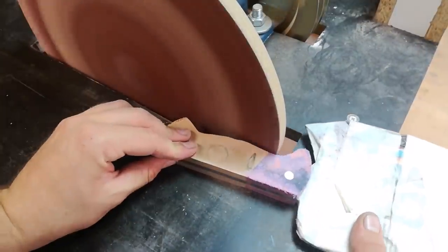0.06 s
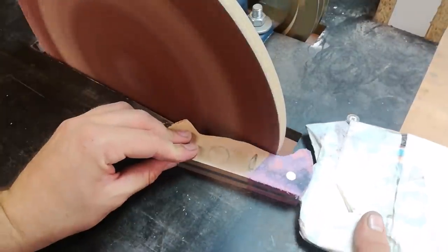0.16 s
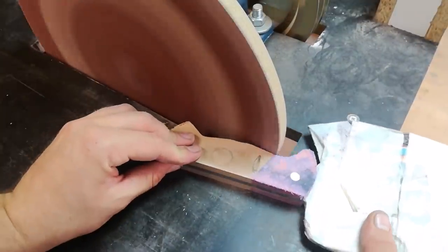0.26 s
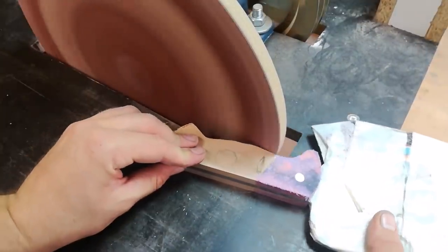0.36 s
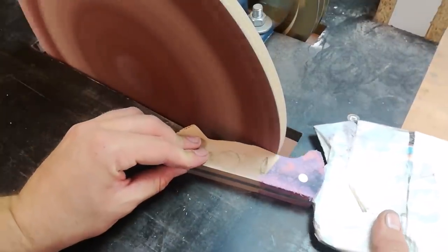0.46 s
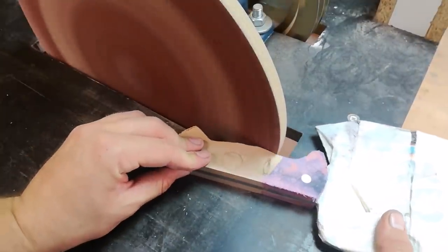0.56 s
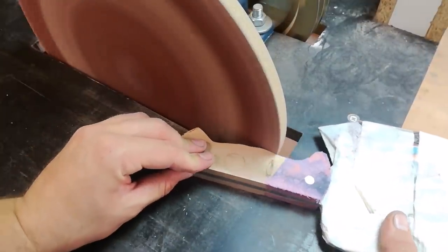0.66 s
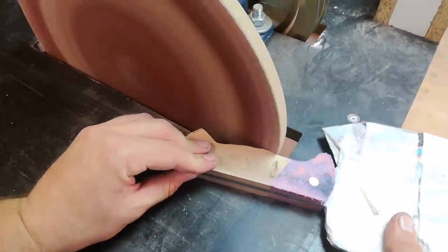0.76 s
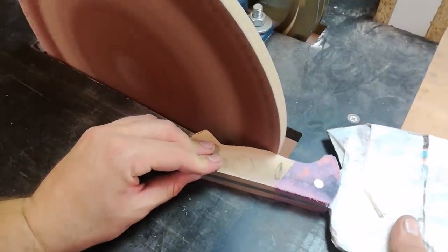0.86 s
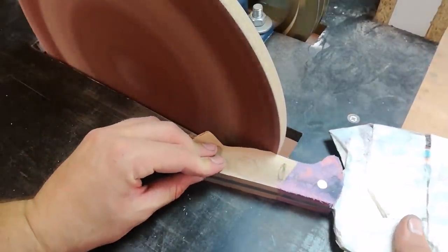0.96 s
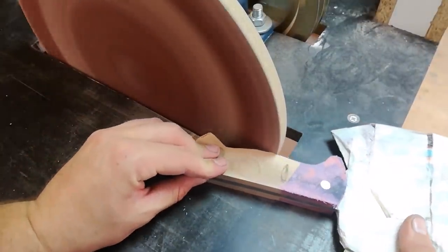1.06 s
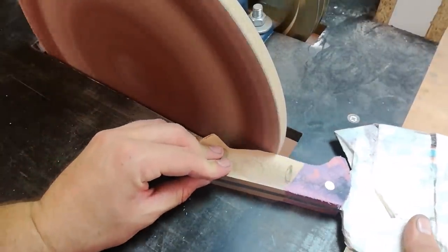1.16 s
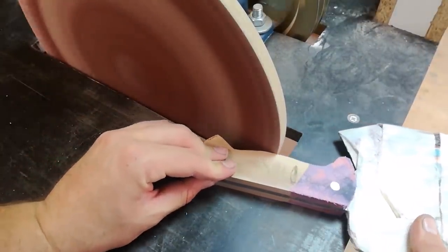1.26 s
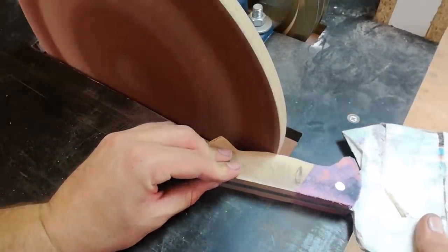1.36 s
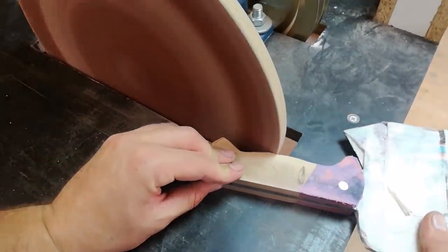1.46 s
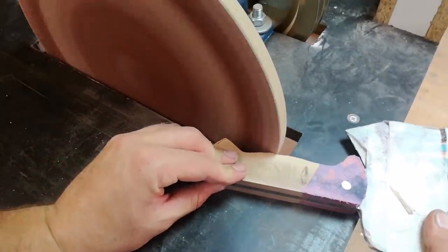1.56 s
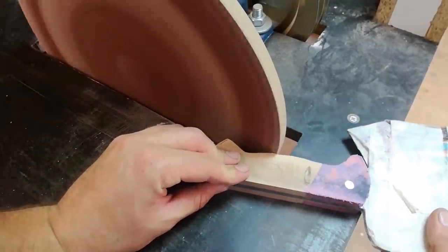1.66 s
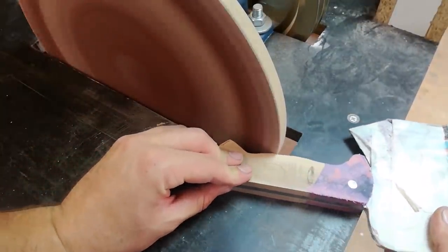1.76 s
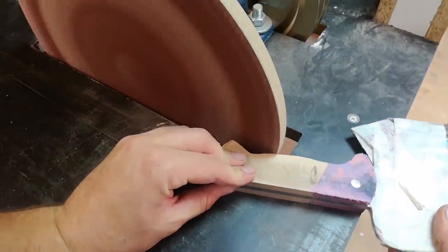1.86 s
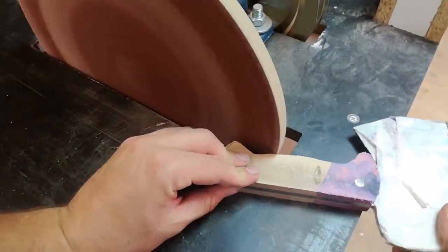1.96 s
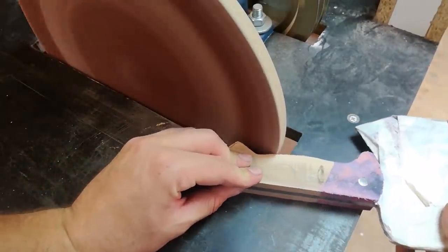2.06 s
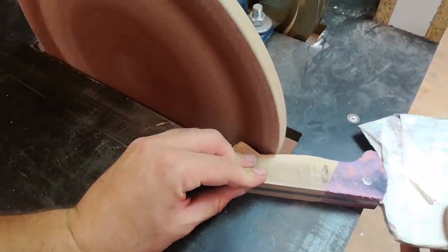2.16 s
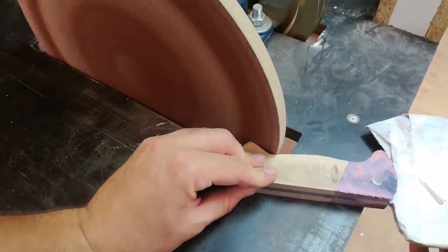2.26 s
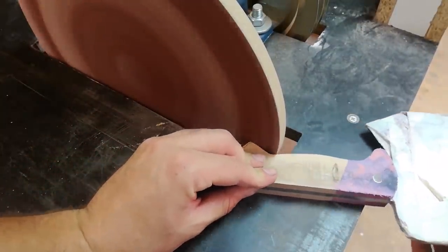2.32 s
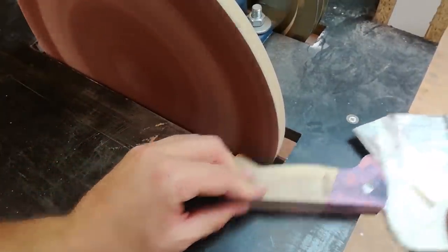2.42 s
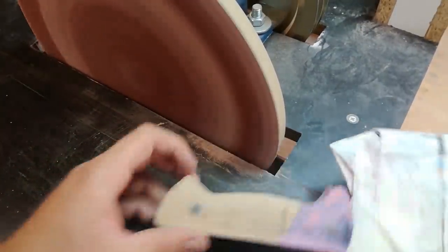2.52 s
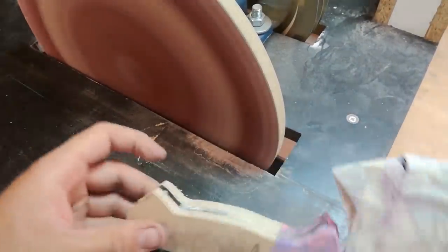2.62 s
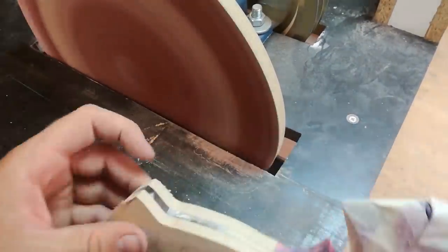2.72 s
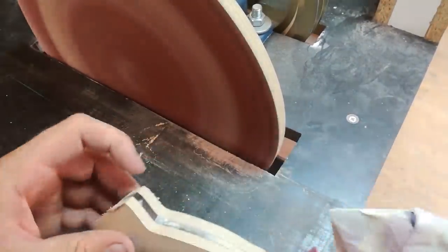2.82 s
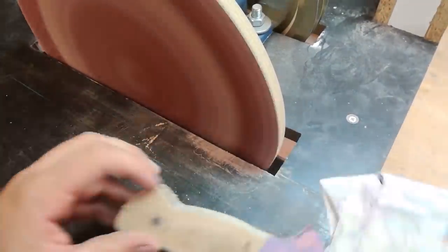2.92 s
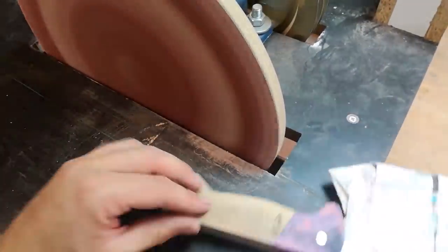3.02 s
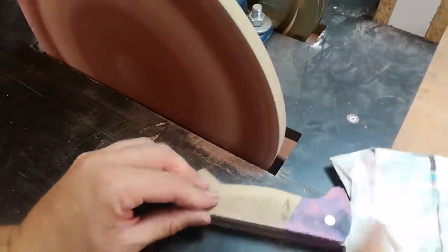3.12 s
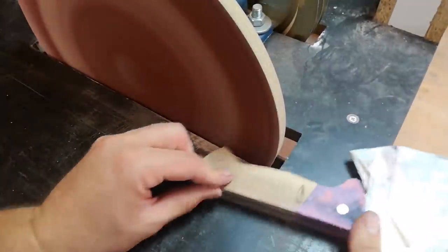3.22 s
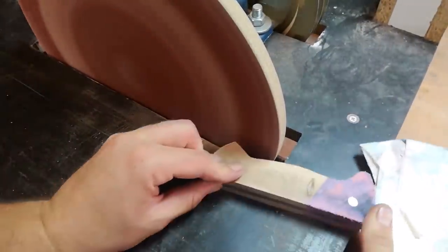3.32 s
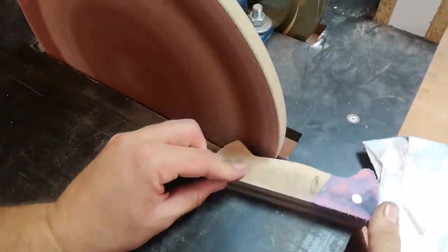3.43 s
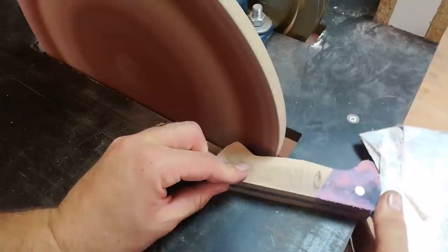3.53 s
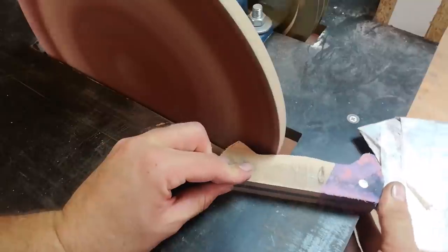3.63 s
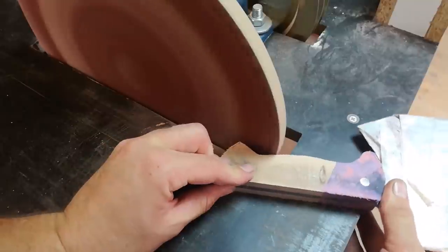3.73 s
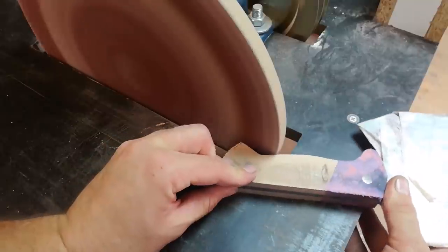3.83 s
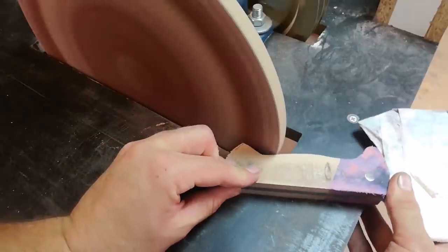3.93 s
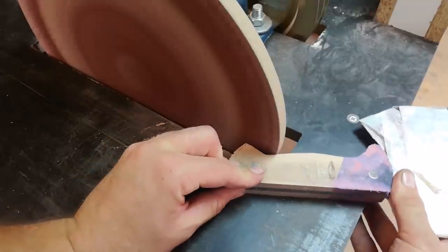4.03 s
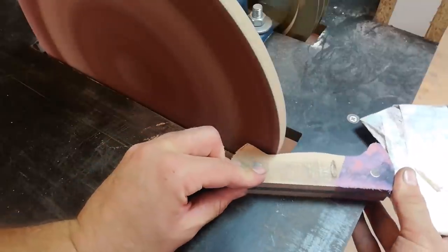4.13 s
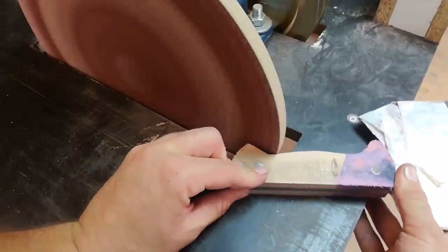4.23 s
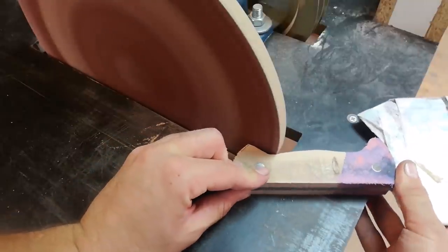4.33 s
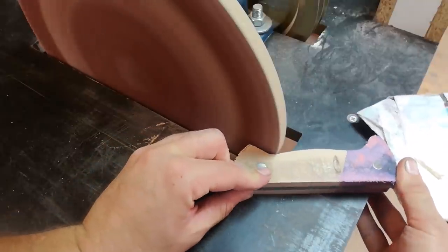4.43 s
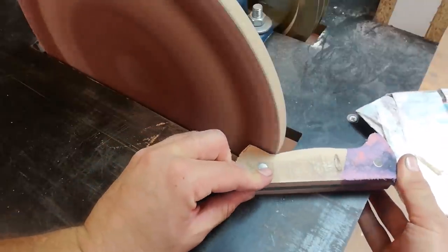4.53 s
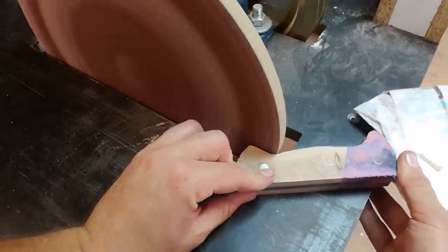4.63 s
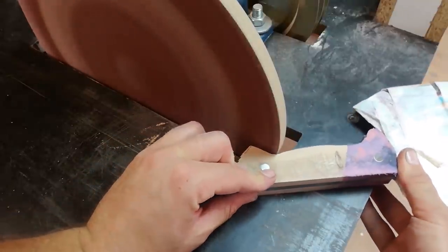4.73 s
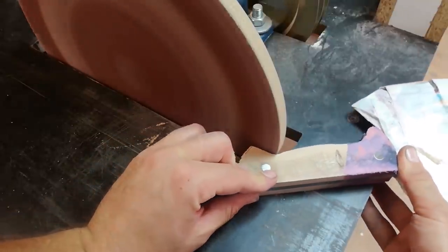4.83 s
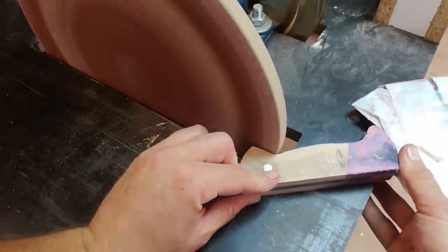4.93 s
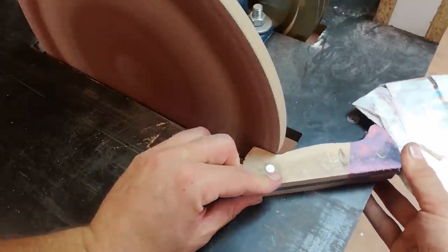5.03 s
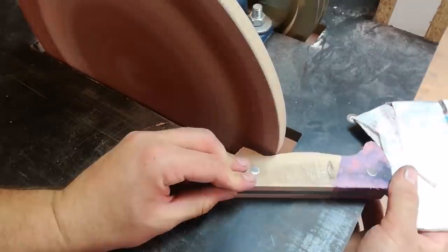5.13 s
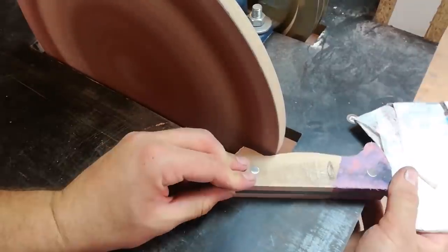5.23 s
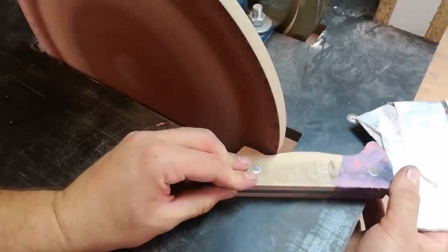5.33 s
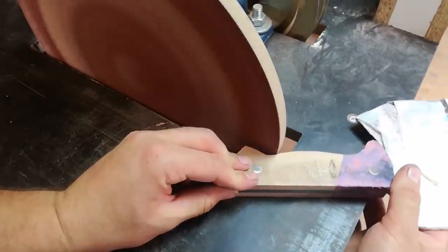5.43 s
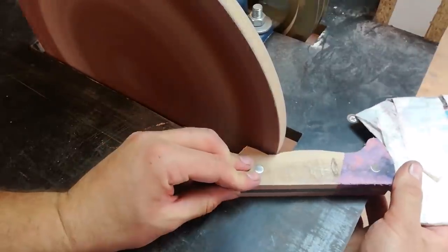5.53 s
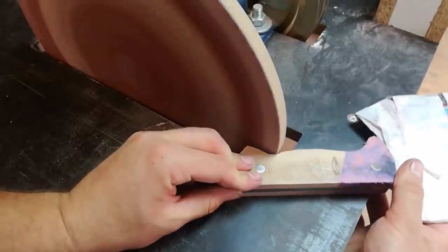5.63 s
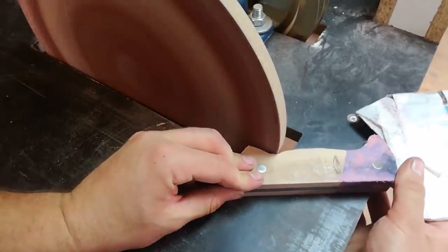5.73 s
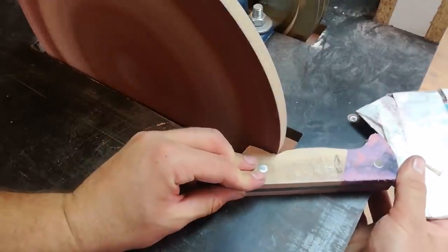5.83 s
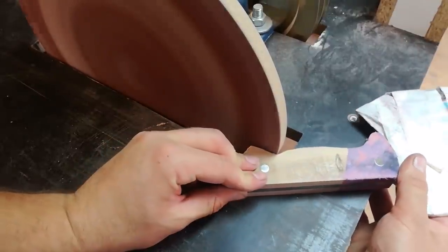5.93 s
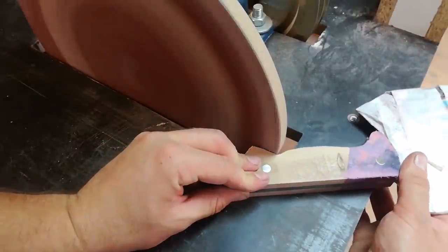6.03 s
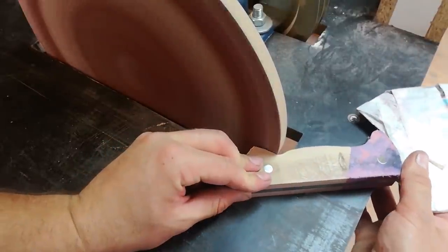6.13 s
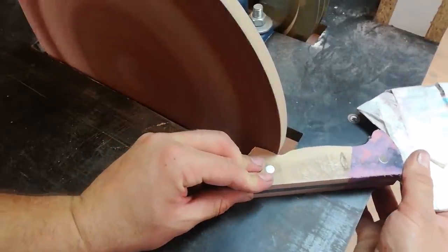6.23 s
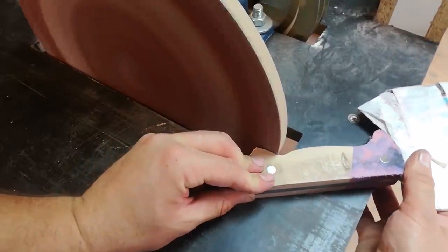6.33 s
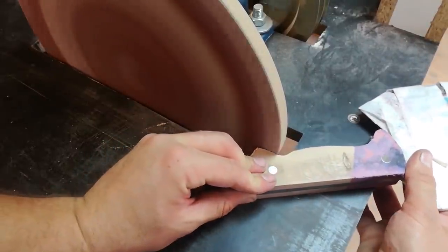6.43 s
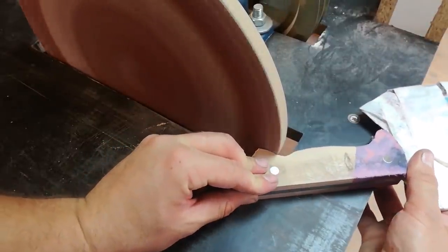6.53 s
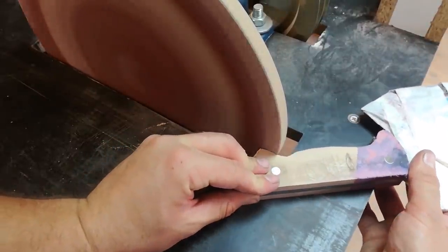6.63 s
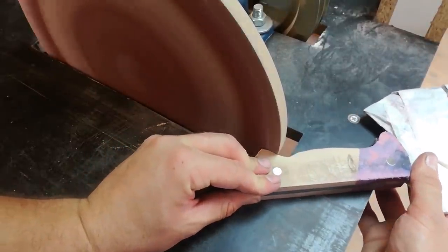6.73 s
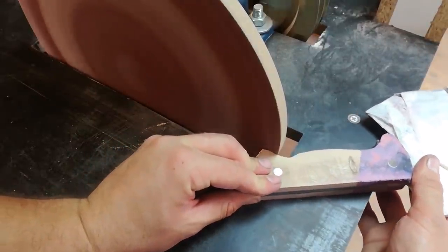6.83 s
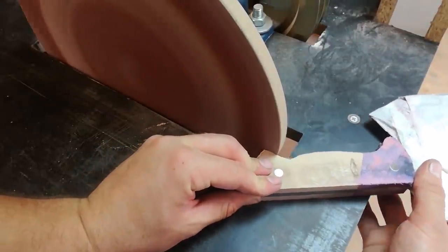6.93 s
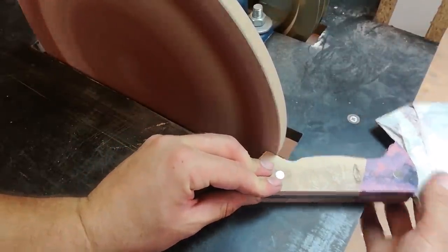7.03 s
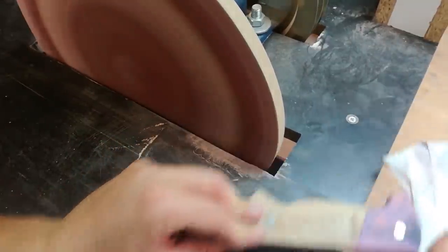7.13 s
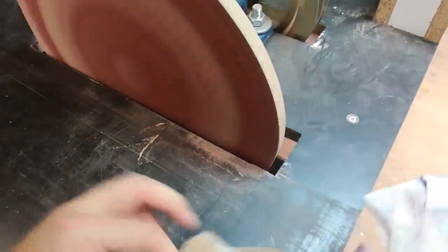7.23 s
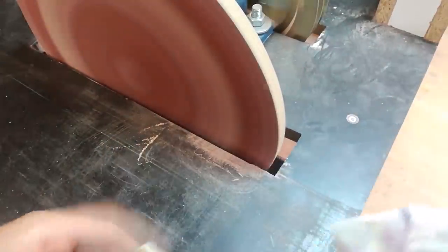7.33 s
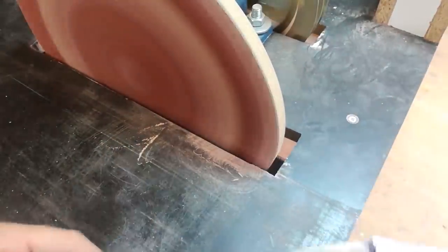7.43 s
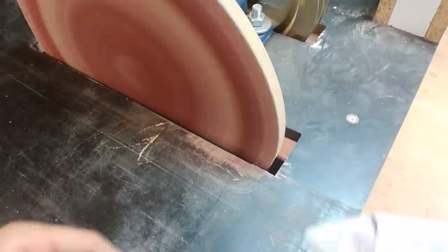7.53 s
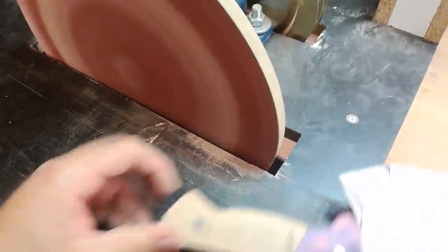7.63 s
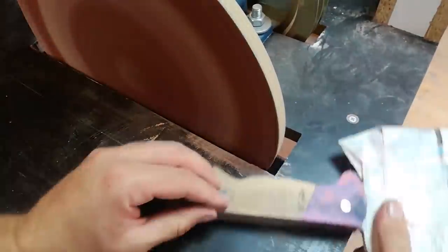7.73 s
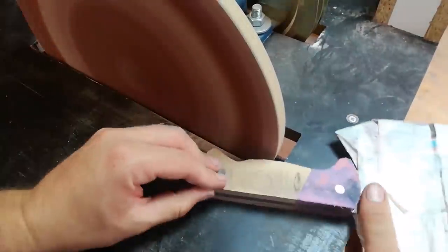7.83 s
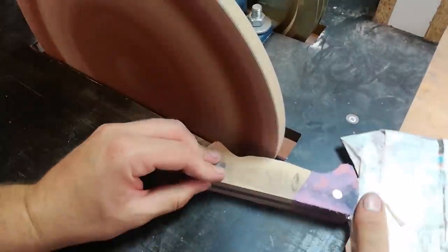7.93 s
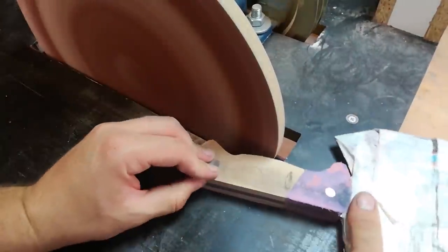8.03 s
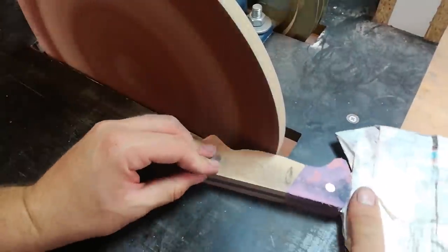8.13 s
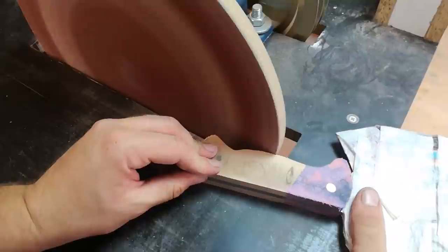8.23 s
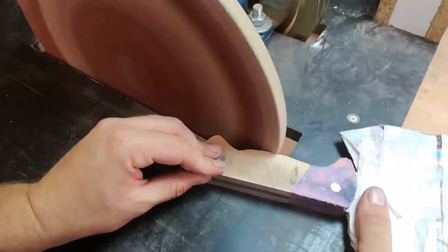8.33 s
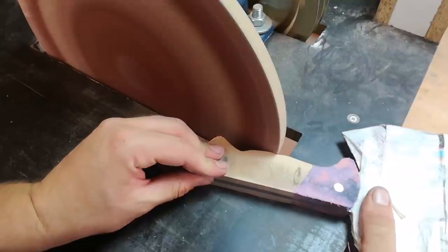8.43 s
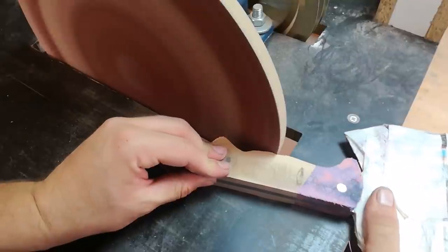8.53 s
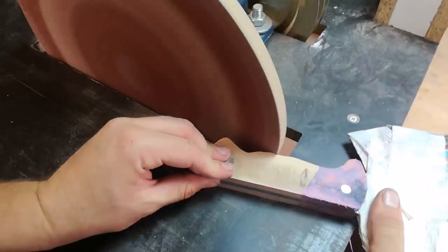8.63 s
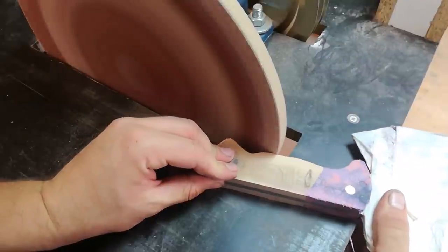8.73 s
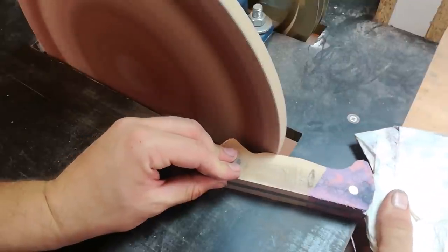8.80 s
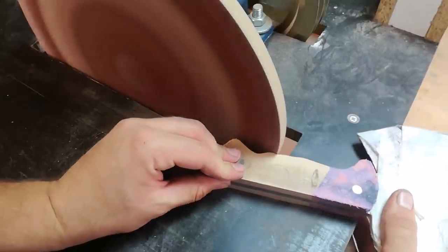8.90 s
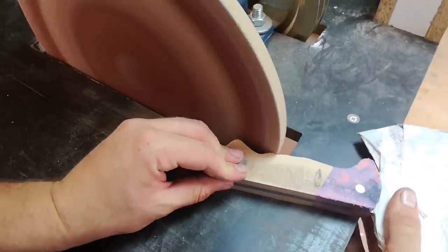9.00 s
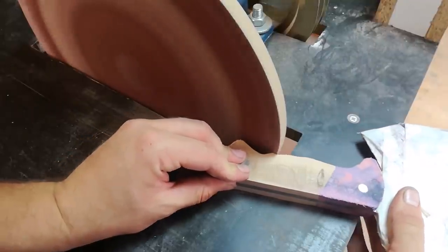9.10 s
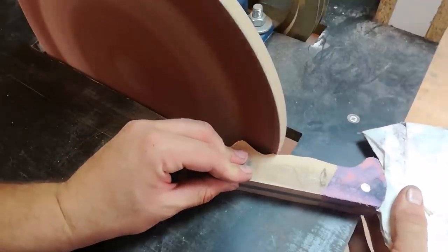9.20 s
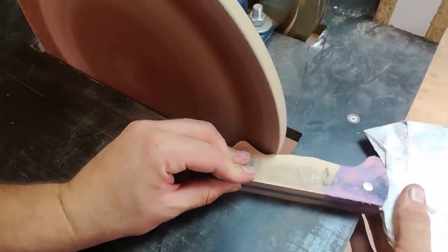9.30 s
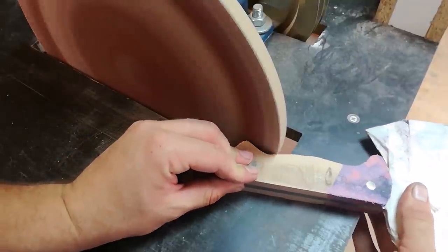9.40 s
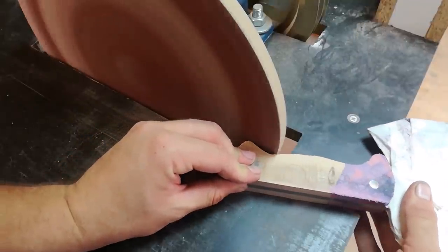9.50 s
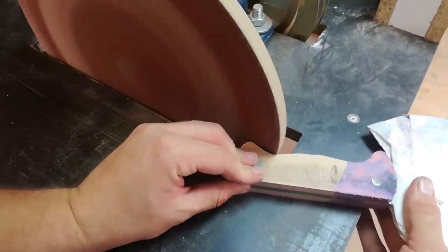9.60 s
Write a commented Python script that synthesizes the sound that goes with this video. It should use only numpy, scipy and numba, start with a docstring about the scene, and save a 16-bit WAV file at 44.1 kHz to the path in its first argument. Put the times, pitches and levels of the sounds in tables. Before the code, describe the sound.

Wood being sanded on a spinning disc in four pulsing, hissing passes, the machine humming softly in the gaps.

```python
"""Sanding a wooden handle

A wooden handle is pressed four times against a disc sander in a small workshop. Every turn drags the
same grit across the wood, and the disc's slight wobble makes the hiss and the table's ring throb.
In each pass the piece touches, settles, rolls onto its edge and lifts; light contact throbs the most.
The motor hums, the disc fans the air, and between passes the piece is twice set on the steel table."""
import sys
import numpy as np
from scipy import signal
from scipy.fft import rfft, irfft, next_fast_len
from scipy.io import wavfile
from scipy.ndimage import uniform_filter1d
from numba import njit

SR = 44100
rng = np.random.default_rng(int(sys.argv[2]) if len(sys.argv) > 2 else 0)


def wav_out(sig):
    """Save sig, one row per channel (or a flat mono array), as 16-bit PCM at SR to the path in sys.argv[1]."""
    wavfile.write(sys.argv[1], SR, np.round(np.clip(np.atleast_2d(sig).T, -1, 1) * 32767).astype(np.int16))


N = 426006
TIME = np.arange(N) / SR
PADDED = next_fast_len(N + 4096)
BINS_HZ = np.maximum(np.arange(PADDED // 2 + 1) * SR / PADDED, 1)
TURNS_PER_S = 27.78
LEFT_LAG_S = 0.00031  # sound reaches the left ear this much later

# How the wood's sound is shared between the ears: (frequency [Hz], left minus right [dB])
WOOD_PAN = [(60, -37), (110, 10), (200, -1), (380, 0), (700, -2), (1290, -5), (2380, -5.5), (4400, -6.5),
            (8120, -11.5), (15000, -18.5)]


def from_db(db):
    """Turn decibels into a gain to multiply by."""
    return 10 ** (np.asarray(db) / 20)


def unit_power(x):
    """Scale a signal so that its average power is 1."""
    return x / np.sqrt(np.mean(x ** 2) + 1e-20)


def ramp(start, length):
    """Rise from 0 to 1 over `length` seconds."""
    return np.clip((TIME - start) / np.maximum(length, 1 / SR), 0, 1)


def bell(x, centre, half_width):
    """A smooth swell of height 1."""
    return np.exp(-((x - centre) / half_width) ** 2)


def fade_in_out(start, end, fade_s=0.2):
    """Fade in around `start` and out around `end`."""
    return ramp(start - fade_s / 2, fade_s) * (1 - ramp(end - fade_s / 2, fade_s))


def drift(rate):
    """A random wander of typical size 1 that changes course `rate` times a second."""
    knots = rng.standard_normal(int(N / SR * rate) + 3)
    return unit_power(np.interp(TIME * rate, np.arange(len(knots)), knots))


def over_hz(points):
    """Join (frequency, value) points into a curve over all frequencies."""
    hz, value = np.transpose(points)
    return np.interp(np.log(BINS_HZ), np.log(hz), value)


def resonance(hz, width_hz):
    """The response of a mode, a pitch at which an object likes to ring; squaring it narrows it."""
    return 1 / (1 + 1j * (BINS_HZ ** 2 - hz ** 2) / (BINS_HZ * width_hz))


def both_ears(x):
    """A low sound reaches the left ear a little later."""
    return np.array([np.interp(TIME - LEFT_LAG_S, TIME, x), x])


def radiate(pair, response, pan):
    """Filter a direct and a scattered signal into stereo; the average of the ears has power 1."""
    # How alike the two ears are: (frequency [Hz], likeness [-1 to 1])
    likeness = [(60, 0.77), (450, 0.62), (1100, 0.92), (2000, 0.11), (4000, .5), (8000, -0.1), (15000, 0.2)]
    direct, scattered = rfft(pair, PADDED) * response
    alike = over_hz(likeness)
    delay = np.exp(-2j * np.pi * BINS_HZ * LEFT_LAG_S)
    left = (alike * delay * direct + np.sqrt(1 - alike ** 2) * scattered) * from_db(over_hz(pan))
    out = irfft(np.array([left, direct]), PADDED)[:, :N]
    return out / np.std(out.mean(axis=0))


def reflections(ripple_db=2.0, spacing_hz=110.5):
    """Close echoes off the table and guard boost some frequencies and weaken others."""
    knots = rng.standard_normal(int(SR / 2 / spacing_hz) + 2)
    ripple = np.interp(BINS_HZ / spacing_hz, np.arange(len(knots)), knots)
    return from_db(ripple_db * np.minimum(BINS_HZ / 3000, 1) * ripple)


def fanned_air():
    """The disc fans the air: a steady rush, coloured by the machine's housing."""
    # The rush of air: (frequency [Hz], level [dB])
    rush = [(40, -36), (90, -15.5), (165, -20), (260, -9), (360, -11.5), (450, -1.5), (700, -4),
            (1000, -7.5), (1450, -6.5), (2260, -7.5), (4680, -12.5), (6020, -7), (9690, -15),
            (16000, -19.5)]
    # Resonances of the housing: (frequency [Hz], width [Hz], boost [dB])
    housing = [(2300, 170, 1.5), (3025, 160, 5.5), (3780, 1340, -5.5), (5870, 2000, 0.5), (8500, 400, -5),
               (9470, 1450, 9.5), (11100, 900, -1), (12400, 1900, 5.5), (15400, 760, 1)]
    # How the rush is shared between the ears: (frequency [Hz], left minus right [dB])
    air_pan = [(60, -9), (110, 1.5), (200, -4), (380, 2.5), (700, -4), (1290, -2.5), (2380, -2), (4400, -1),
               (8120, -8), (15000, -8.5)]
    housing_db = sum(db * 0.5 ** ((2 * (BINS_HZ - hz) / width) ** 2) for hz, width, db in housing)
    air = radiate(rng.standard_normal((2, N)), from_db(over_hz(rush) + housing_db), air_pan)
    return from_db(-53) * air * from_db(0.38 * drift(25))


def mains_hum(running, load, hum_hz=99.9):
    """Mains current makes the motor hum in a stack of wavering tones that grow under load."""
    # Tones of the hum: (multiple of hum_hz, idle level [dB], level relative to the load [dB])
    tones = [(1, -81.5, -6), (2, -79, -45), (3, -78.5, -8), (4, -83, -14), (5, -64.5, -18), (6, -66.5, -17),
             (7, -66.5, -2), (8, -73.5, -18), (9, -72, -16)]
    # Single tones swell now and then: (multiple of hum_hz, time [s], half length [s], boost [dB])
    swells = [(6, 2.57, 0.2, 10.5), (6, 2.97, 0.13, 6), (6, 7.39, 0.07, 6), (5, 3.27, 0.06, 9.5),
              (5, 8.04, 0.23, 8.5)]
    hum = 0
    for multiple, idle_db, load_db in tones:
        swell_db = sum(db * bell(TIME, at, length) for k, at, length, db in swells if k == multiple)
        gain = from_db(idle_db + swell_db) * running + from_db(load_db) * load
        waver = from_db(2.0 * drift(7))
        hum += gain * waver * np.sin(2 * np.pi * multiple * hum_hz * TIME + 0.35 * drift(5.5))
    return hum


def motor(turns, hand):
    """The running machine: its hum, the fanned air, and a shaft that shakes under load."""
    # Loudness of the idle hum and the air: (time [s], level [dB])
    loudness = [(0, 1), (5.15, 1), (5.25, 0.5), (7.2, 4.5), (9.66, 7)]
    # Tones of the shaking shaft: (multiple of the turn rate, level relative to the load [dB])
    shaft_tones = [(2, -21), (3, -8), (4, -0.5), (5, -9)]
    running = from_db(np.interp(TIME, *np.transpose(loudness)))
    load = pressing(hand, hand["load"], rise_db=38, lean_db=5, edge_share=0.3)
    hum = mains_hum(running, load)
    shake = sum(from_db(db) * np.sin(2 * np.pi * (k * turns + rng.random())) for k, db in shaft_tones)
    return hum + load * shake + running * fanned_air()


def knocks():
    """Wood meets the steel table: a short crack and dying tones; the small piece gives little bass."""
    # The piece is set down: (time [s], level [dB])
    set_downs = [(3.013, -34.5), (7.7224, -27)]
    # What a knock rings with: (frequency [Hz], level [dB], time to fall by 60 dB [s])
    modes = [(120, -22, 0.09), (315, -14, 0.17), (378, -7, 0.11), (452, -7.5, 0.09), (580, -9, 0.059),
             (735, -9, 0.068), (874, -4.5, 0.1), (1076, -13, 0.075), (1300, -18, 0.045), (1820, -13, 0.096),
             (2080, -12, 0.057), (2800, -21, 0.081), (3920, -18, 0.049)]
    out = np.zeros((2, N))
    age = np.arange(SR // 2) / SR
    attack = 1 - np.exp(-age / 0.0003)
    crack_band = signal.butter(2, [300, 2600], "band", fs=SR, output="sos")
    for at, db in set_downs:
        ring = 0
        for hz, mode_db, decay_s in modes:
            phase = 2 * np.pi * (hz * age + rng.random())
            ear_shift = rng.normal(0, 1, (2, 1)) * hz / 1500
            ring += from_db(mode_db - 60 * age / decay_s) * np.sin(phase + ear_shift)
        noise = signal.sosfilt(crack_band, rng.standard_normal((2, len(age))))
        crack = noise * from_db(-1 - 60 * age / 0.039)
        start = int(at * SR)
        out[:, start:start + len(age)] += from_db(db) * attack * (ring + crack)
    return signal.sosfilt(signal.butter(2, 240, "high", fs=SR, output="sos"), out)


def bumps(half_length_s=0.01):
    """A lone push on the table gives a pitched bump as the piece touches or leaves the disc."""
    # Pushes against the table: (time [s], peak level [dB], pitch [Hz])
    pushes = [(0.096, -34.5, 488), (2.288, -39, 552), (2.361, -52, 455), (7.052, -41, 442),
              (7.088, -48, 450)]
    return both_ears(sum(from_db(db) * bell(TIME, at, half_length_s)
                         * np.sin(2 * np.pi * hz * (TIME - at)) for at, db, hz in pushes))


def ticks(decay_s=0.0013):
    """A grain that sticks out flicks the wood once a turn with a thin, high ping."""
    # Runs of ticks: (start [s], level [dB], number of turns, change per turn [dB])
    runs = [(4.268, -31, 1, 0), (4.3033, -29, 7, -0.8), (4.591, -34.5, 6, 0.3), (4.685, -37, 4, 2)]
    # What a tick rings with: (frequency [Hz], width [Hz], level [dB])
    modes = [(3950, 300, -10), (7250, 900, -1), (8400, 610, -4), (9360, 430, 5), (11500, 3200, -10)]
    force = np.zeros(N)
    for start, db, count, change_db in runs:
        for turn in range(count):
            away_s = np.abs(TIME - start - turn / TURNS_PER_S)
            force += from_db(db + change_db * turn) * np.exp(-np.minimum(away_s / decay_s, 20))
    ping = sum(from_db(db) * resonance(hz, width) ** 2 for hz, width, db in modes)
    return np.std(force) * radiate(force * rng.standard_normal((2, N)), ping, WOOD_PAN)


def catches():
    """An edge digs into the grit: short swells of force on the wood's surface and on its body."""
    # Catches, repeated one turn apart: (time [s], level [dB], half length [s], number of turns,
    # change per turn [dB], body relative to surface [dB])
    digs = [(0.06, -41, 0.0036, 1, 0, -12), (0.073, -37, .002, 1, 0, -12), (0.088, -38.5, 0.01, 1, 0, -7),
            (0.129, -39.5, 0.005, 1, 0, -11), (2.044, -32.5, 0.0026, 1, -0.5, -13.5),
            (2.106, -44, .007, 3, -2.5, -12.5), (2.278, -40.5, 0.017, 1, 0, -0.5),
            (2.322, -47, 0.0077, 1, -0.5, -1), (3.621, -46, 0.0076, 1, 0, -1.5),
            (3.657, -37.5, 0.0035, 6, -0.5, -10.5), (4.871, -39.5, 0.0083, 4, -0.5, -6.5),
            (5.051, -41.5, .007, 1, 1, -3.5), (5.285, -49, 0.0018, 7, 0.5, -0.5),
            (5.681, -42, 0.0037, 2, 5, -7), (5.887, -37, .0033, 6, 0.2, -16),
            (6.832, -33.5, 0.0032, 5, 1.0, -14), (6.857, -36.5, 0.0073, 5, .5, -7.5),
            (7.013, -38, 0.0037, 1, 0, -7), (8.125, -39.5, .0036, 2, -1, -8),
            (8.229, -37.5, 0.0083, 1, 0, -9), (9.563, -35.5, 0.0092, 3, -1.5, -6)]
    surface, body = np.zeros((2, N))
    for start, db, length, count, change_db, body_db in digs:
        for turn in range(count):
            at = start + turn / TURNS_PER_S
            near = slice(*np.searchsorted(TIME, [at - 2 * length, at + 2 * length]))
            swell = from_db(db + change_db * turn) * np.exp(-np.abs((TIME[near] - at) / length) ** 3)
            surface[near] += swell
            body[near] += from_db(body_db) * swell
    return surface, body


def handling(easing_s=0.15):
    """How the hand holds the wood against the disc at every moment, as a set of named curves."""
    # The four passes: (touches [s], fully seated [s], rolls onto its edge [s], lifts [s],
    # settling time [s], hiss [dB], rasp [dB], table ring [dB], motor load [dB],
    # throb before each layer scales it [dB], bite of the edge [dB], ring pitch [Hz], its fall [Hz/s],
    # disc's high spot [turns], ring's spot [turns], ring's early swell [dB], loose grip [0 to 1])
    passes = np.array([(0.12, 0.147, 2.25, 2.358, 0.12, -43, -49.5, -43, -75.5, 3.5, 1.5, 488, 12.5, 0.39, 0.63, -4.5, 0.03),
                       (3.59, 3.71, 4.63, 5.11, 0.22, -51.5, -51, -47.3, -88, 4.5, 2, 461, 5, 0.29, 0.4276, -5, 0.07),
                       (5.198, 5.807, 6.83, 7.065, 0.55, -39.5, -43, -46.5, -66.5, 2.5, 1.5, 457, 7.7, 0.55, 0.69, -4, 0.3),
                       (8.178, 8.247, 9.43, 9.83, 0.4, -39.5, -42.5, -41.5, -69.5, 3, -1, 477.3, 10.3, 0.5, 0.63, -2.5, 0.11)])
    columns = ("touch seated roll lift settling hiss rasp ring load throb edge "
               "ring_hz sag high_spot ring_spot early loose").split()
    current = np.maximum(np.searchsorted(passes[:, 0], TIME) - 1, 0)
    hand = dict(zip(columns, passes.T[:, current]))
    since_seated = np.maximum(TIME - hand["seated"], 0)
    until_lift = np.maximum(hand["lift"] - TIME, 0)
    progress = ramp(hand["seated"], hand["lift"] - hand["seated"])
    roll_progress = ramp(hand["roll"], hand["lift"] - hand["roll"])
    hand["lean"] = np.sin(np.pi * progress)
    hand["rolled"] = np.sqrt(np.abs(np.sin(np.pi * roll_progress)))
    # Contact is light at both ends of a pass: the throb is deeper and comes later in the turn.
    light = np.maximum(bell(since_seated, 0, hand["settling"]), np.exp(-until_lift / easing_s))
    hand["throb"] += 3.5 * light - 1.4 * progress  # it evens out as the hand keeps leaning
    hand["high_spot"] += 0.1 * light
    hand["ring_spot"] += 0.037 * light
    hand["ring_hz"] -= hand["sag"] * since_seated
    hand["ring"] -= 3.5 * progress  # the ring fades as the contact slides along the piece
    hand["surface_catch"], hand["body_catch"] = catches()
    return hand


def pressing(hand, level_db, rise_db, lean_db, edge_share):
    """A layer's gain in a pass: it rises until seated, follows lean and edge, and dies at the lift."""
    touch_s, release_s = 0.0081, 0.018
    let_go_s, let_go_db = 0.039, 11.5  # the hand lets go just before the lift
    seating = ramp(hand["touch"], hand["seated"] - hand["touch"])
    touching = ramp(hand["touch"], touch_s) * np.exp(-np.maximum(TIME - hand["lift"], 0) / release_s)
    edge_db = hand["edge"] * hand["rolled"] - let_go_db * ramp(hand["lift"] - let_go_s, let_go_s)
    press_db = level_db - rise_db * (1 - seating) + lean_db * hand["lean"]
    return touching * from_db(press_db + edge_share * edge_db)


def throb(turns, high_spot, depth_db):
    """The wobbling disc presses harder for half of each turn; the average power stays 1."""
    gain = from_db(depth_db * np.tanh(1.07 * np.cos(2 * np.pi * (turns - high_spot))))
    return gain / np.sqrt(uniform_filter1d(gain ** 2, int(SR / TURNS_PER_S)))


def disc_track(turns, keep, smoothing=1):
    """A random pattern round the disc; as the wood moves, the share `keep` carries to the next turn."""
    places = int(SR / TURNS_PER_S)
    fresh = rng.standard_normal((int(turns[-1]) + 42, places))
    pattern = signal.lfilter([1], [1, -keep], fresh, axis=0)[40:]  # 40 turns to settle
    track = uniform_filter1d(pattern.ravel(), smoothing)
    return unit_power(track[(turns * places).astype(int)])


def grit(turns, keep, coarse_db):
    """Two signals of dense scratches, bunched where coarser grains sit on the disc."""
    grains = from_db(coarse_db * np.clip(disc_track(turns, keep=0.82, smoothing=44), -2.5, 2.5))
    return np.array([unit_power(disc_track(turns, keep) * grains) for _ in range(2)])


def table_ring(turns, hand):
    """Each turn bows the piece against the table: a low note swells, peaks and breaks off."""
    main_at, early_at = 0.58, 0.23  # places of the two swells [turns]
    place = (turns - hand["ring_spot"] + main_at) % 1
    early = from_db(hand["early"] + 2.0 * drift(25)) * bell(place, early_at, half_width=0.18)
    burst = np.sqrt(np.sin(np.pi * place)) * (bell(place, main_at, half_width=0.3) + early)
    phase = 2 * np.pi * hand["ring_hz"] * place / TURNS_PER_S
    tone = np.sin(phase + 0.47 * drift(14) + 0.22 * drift(90))
    clean = both_ears(unit_power(burst * tone * from_db(drift(12))))
    # A looser grip makes the ring rattle.
    rattle = radiate(grit(turns, keep=0.8, coarse_db=4.0), resonance(450, 136) ** 2, WOOD_PAN)
    rattle *= throb(turns, hand["ring_spot"], depth_db=2.0)
    gain = pressing(hand, hand["ring"], rise_db=20, lean_db=1.7, edge_share=-0.075)
    return gain * (np.sqrt(1 - hand["loose"]) * clean + np.sqrt(hand["loose"]) * rattle)


def wood_modes(scratches, modes):
    """Each mode of the wood swells while the contact lies where it can stir it."""
    # When each mode sounds: (mode name, start [s], end [s], level [dB])
    spells = [("hollow", 0.088, 0.39, -7), ("knocking", 0.11, 0.42, -6.5), ("woody", 0.1, 2.08, -5),
              ("thin", 0.1, 0.9, -13), ("keen", 0.25, 1.3, -16), ("whistling", 3.55, 4.9, -10),
              ("growling", 3.74, 5.1, -12), ("knocking", 4.12, 5.15, -4.5), ("knocking", 5.35, 6.9, -12.5),
              ("nasal", 5.65, 6.9, -12.5), ("woody", 5.7, 6.9, -9.5), ("whistling", 6.4, 7.8, -9.5),
              ("hollow", 8.25, 9.0, -10.5), ("knocking", 8.3, 9.3, -7), ("sizzling", 8.9, 9.7, -11)]
    out = 0
    for name, (hz, width) in modes.items():
        gain = sum(from_db(db) * fade_in_out(start, end)
                   for mode, start, end, db in spells if mode == name)
        waver = from_db(0.5 * drift(9.7))
        out += gain * waver * radiate(scratches, resonance(hz, width) ** 1.5, WOOD_PAN)
    return out


def bending(turns):
    """Once a turn the disc bows the piece, and its two bending modes answer with short, raspy notes."""
    # Bending notes: (pitch [Hz], start [s], end [s], level relative to the rasp [dB],
    # spot on the disc [turns], half width [turns], roughness [radians])
    notes = [(2036, 0.1, 1.85, -6, 0.48, 0.47, 0.57), (4025, 1.08, 2.164, -2.5, 0.43, 0.5, 1.5),
             (3930, 3.6, 5.1, -10.5, 0.57, 0.22, 1.6), (2043, 5.8, 6.3, -6.5, 0.65, 0.3, 0.6),
             (2067, 6.3, 6.88, -4.5, 0.765, 0.3, 0.5), (4060, 5.87, 6.3, -9, 0.54, 0.15, 1.3),
             (4060, 6.3, 6.85, -9, 0.77, 0.2, 1.4), (2055, 8.2, 9.5, -10.5, 0.45, 0.16, 0.85),
             (4030, 8.32, 9.5, -4.5, 0.41, 0.18, 1.1)]
    jitter = np.array([drift(380), drift(380)])
    sway = np.array([2 * drift(16), 0.7 * drift(5)])
    out = np.zeros((2, N))
    for hz, start, end, db, spot, width, roughness in notes:
        gain = fade_in_out(start, end)
        on = gain > 0
        place = (turns[on] - spot + 0.5) % 1
        pulse = unit_power(bell(place, 0.49, width) * np.sqrt(np.sin(np.pi * place)))
        phase = 2 * np.pi * hz * place / TURNS_PER_S + sway[:, on] + roughness * jitter[:, on]
        out[:, on] += from_db(db) * gain[on] * pulse * np.sqrt(2) * np.sin(phase)
    return np.std(out) * radiate(out, 1, WOOD_PAN) * from_db(1.2 * drift(20))


def rasping(turns, hand):
    """Grit tears the wood's fibres and shakes the whole piece."""
    # Tone colour of the rasp: (frequency [Hz], level [dB])
    colour = [(60, -40), (150, -24), (240, -27.5), (320, -2.5), (560, -6), (660, -3), (900, 4.5),
              (1120, 4.5), (1300, 4.5), (1550, -1), (1780, 3), (2320, 3), (2620, -3), (3050, -1),
              (3700, -1), (4300, 1), (4650, -9), (5100, -1.5), (6500, -7.5)]
    # Modes stirred when the edge bites: (frequency [Hz], width [Hz], level [dB])
    edge_modes = [(2705, 290, -0.5), (3180, 240, 0.5), (4250, 880, -1), (5290, 140, 3)]
    # Low modes of the piece, by name: (frequency [Hz], width [Hz])
    body_modes = {"growling": (344, 55), "hollow": (917, 56), "knocking": (1088, 205), "nasal": (1320, 100),
                  "woody": (1920, 520)}
    gain = pressing(hand, hand["rasp"], rise_db=19.5, lean_db=-1.2, edge_share=0.91)
    wobble = throb(turns, hand["high_spot"] + 0.033, 0.36 * hand["throb"])
    force = np.hypot(gain * wobble, hand["body_catch"])  # hypot adds the two as powers
    tearing = grit(turns, keep=0.65, coarse_db=2.0)
    body = from_db(1.0) * radiate(tearing, from_db(over_hz(colour)) * reflections(), WOOD_PAN)
    scratches = grit(turns, keep=0.61, coarse_db=1.5)
    edge_response = sum(from_db(db) * resonance(hz, width) ** 2 for hz, width, db in edge_modes)
    # The edge sounds when the piece is rolled, and more so in the harder passes.
    rolled_boost_db = 17 + 0.55 * (hand["rasp"] - hand["rasp"].max())
    edge_gain = from_db(-15.5 + rolled_boost_db * hand["rolled"])
    edge = edge_gain * radiate(scratches, edge_response, WOOD_PAN)
    chatter = throb(turns, hand["ring_spot"] - 0.08, depth_db=2.0) * wood_modes(scratches, body_modes)
    return force * (body + edge) + gain * (chatter + bending(turns))


def scraping_force(turns, hand):
    """The two forces behind the hiss: the throbbing press, and brushes of the wood's broad face."""
    # The broad face comes to lie on the disc: (time [s], level [dB], half length [s])
    brushes = [(2.022, -43.5, 0.098), (3.76, -44, 0.098), (4.317, -42, 0.14), (4.554, -45.5, 0.17),
               (4.818, -43.5, 0.12), (5.67, -52.5, 0.12)]
    ridge_spot = 0.53  # where a ridge of coarse grit flicks the wood [turns]
    flick = bell((turns - ridge_spot + 0.5) % 1, 0.52, half_width=0.083)
    press = pressing(hand, hand["hiss"], rise_db=27.5, lean_db=0.1, edge_share=1)
    press *= np.hypot(throb(turns, hand["high_spot"], 1.11 * hand["throb"]), from_db(-9) * flick)
    brush = sum(from_db(db) * bell(TIME, at, length) for at, db, length in brushes)
    brush *= np.hypot(throb(turns, ridge_spot, depth_db=1.4), from_db(4) * flick)
    return np.hypot(press, hand["surface_catch"]), brush


@njit
def gliding_mode(x, angle, radius):
    """A resonance whose pitch follows `angle` (radians per sample); a radius near 1 rings longer."""
    y = np.zeros(len(x))
    for i in range(2, len(x)):
        y[i] = x[i] - x[i - 2] + 2 * radius * np.cos(angle[i]) * y[i - 1] - radius * radius * y[i - 2]
    return y


def hiss_peak(scratches, width_hz=570, waver_hz=80):
    """A narrow band of the hiss glides and swells as the grip changes."""
    # Path of the peak: (time [s], frequency [Hz], level [dB])
    path = [(0.15, 7350, -5), (0.8, 7660, 0), (1.2, 7720, -0.5), (1.7, 7300, -2.5), (2.1, 7060, -4),
            (3.65, 7250, -1.5), (3.95, 6680, -0.5), (4.25, 7200, -3), (4.8, 6770, 0), (5.6, 7280, -1),
            (6.2, 7150, -4), (6.9, 6870, -4.5), (8.2, 7600, -1.5), (8.85, 7460, 0.5), (9.3, 7350, -3),
            (9.55, 6900, 0)]
    times, hz, db = np.transpose(path)
    angle = 2 * np.pi * (np.interp(TIME, times, hz) + waver_hz * drift(14)) / SR
    radius = np.exp(-np.pi * width_hz / SR)
    singing = np.array([gliding_mode(row, angle, radius) for row in scratches])
    return from_db(np.interp(TIME, times, db)) * radiate(singing, 1, WOOD_PAN)


def hissing(turns, hand):
    """The finest scratches make a bright hiss with a gliding peak and thin, high tones."""
    # Tone colour of the hiss under the press: (frequency [Hz], level [dB])
    press_colour = [(3500, -23), (4700, -5.5), (5300, -4), (5700, -7.5), (6500, -0.5), (8000, 2),
                    (8600, 0.5), (10000, 0.5), (10700, 0.5), (11300, -3.5), (13500, -8.5), (16000, -18)]
    # Tone colour of the broad face's hiss: (frequency [Hz], level [dB])
    face_colour = [(3500, -23), (4500, -2), (5600, -8), (6400, 0.5), (8000, 2.5), (9400, 4), (11000, -3),
                   (13500, -5), (16000, -17)]
    # High modes of the piece, by name: (frequency [Hz], width [Hz])
    high_modes = {"keen": (5420, 300), "whistling": (9300, 260), "sizzling": (10700, 380),
                  "thin": (11100, 260)}
    fine = grit(turns, keep=0.25, coarse_db=2.5)
    hiss = from_db(-2.5) * radiate(fine, from_db(over_hz(press_colour)) * reflections(), WOOD_PAN)
    scratches = grit(turns, keep=0.44, coarse_db=3.5)
    peak = hiss_peak(scratches)
    face_grit = grit(turns, keep=0.23, coarse_db=2.5)
    face = from_db(-2.0) * radiate(face_grit, from_db(over_hz(face_colour)), WOOD_PAN)
    ringing = peak + wood_modes(scratches, high_modes)
    press, brush = scraping_force(turns, hand)
    return press * hiss + brush * face + np.hypot(press, brush) * ringing


def scene():
    """The turning disc and the pressing hand drive the sanding and the motor; knocks fall between."""
    turns, hand = TURNS_PER_S * TIME, handling()
    wood = rasping(turns, hand) + hissing(turns, hand) + table_ring(turns, hand) + ticks() + bumps()
    return wood + motor(turns, hand) + knocks()


def record(dry):
    """The level dips briefly once, and the highest treble is cut steeply."""
    dip_at_s, dip_half_s, dip_db = 5.202, 0.031, -29
    cutoff_hz = 15850
    dip = from_db(dip_db * np.maximum(1 - np.abs(TIME - dip_at_s) / dip_half_s, 0))
    treble_cut = signal.ellip(12, 0.1, 80, cutoff_hz, fs=SR, output="sos")
    return signal.sosfilt(treble_cut, dry * dip)


dry = scene()
out = record(dry)
wav_out(out)
```